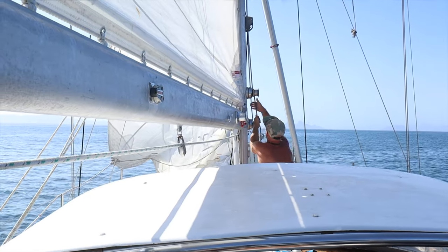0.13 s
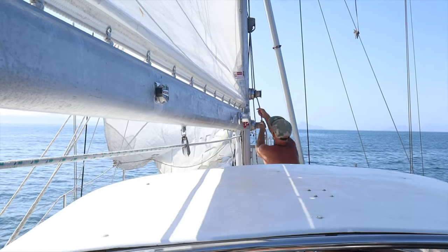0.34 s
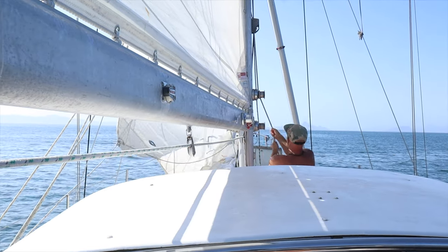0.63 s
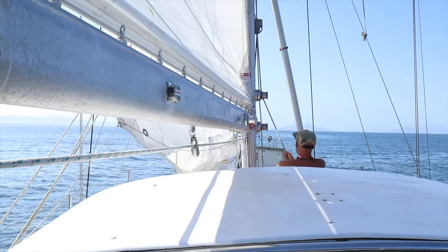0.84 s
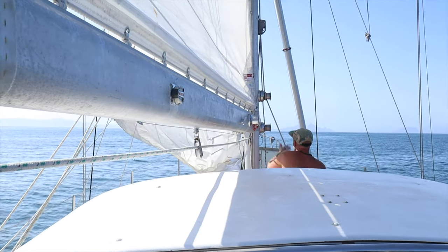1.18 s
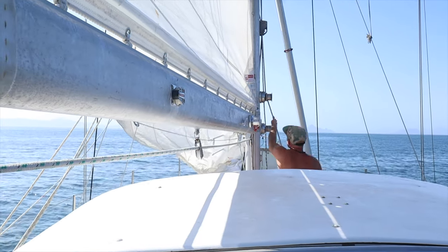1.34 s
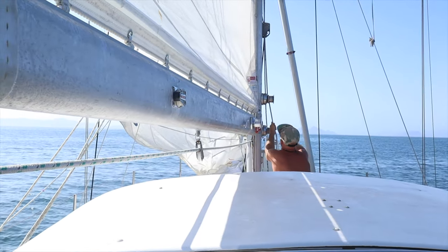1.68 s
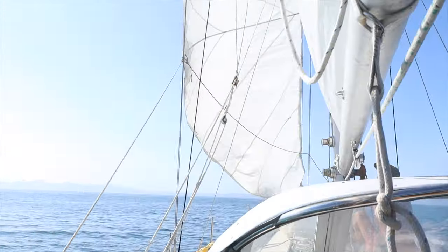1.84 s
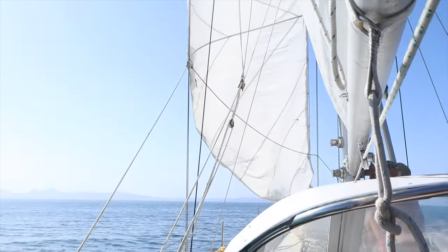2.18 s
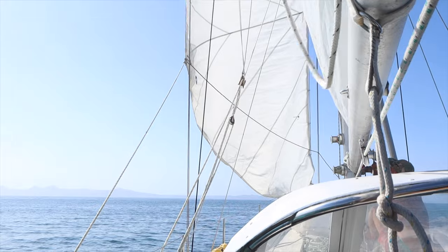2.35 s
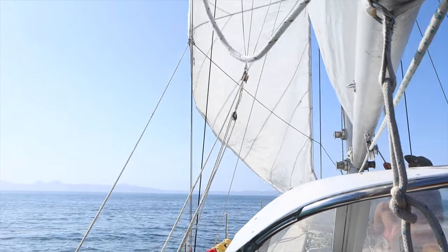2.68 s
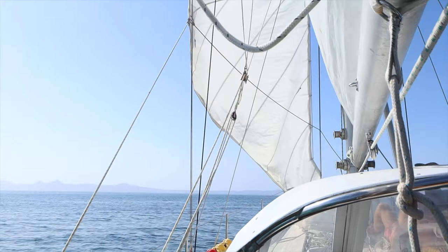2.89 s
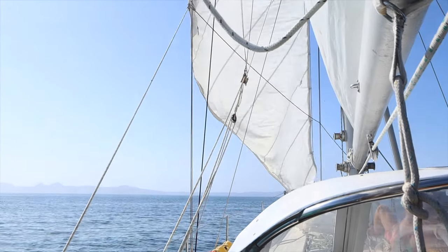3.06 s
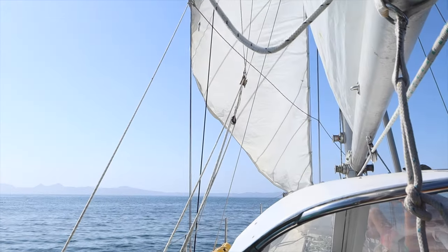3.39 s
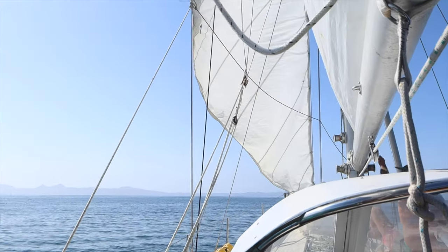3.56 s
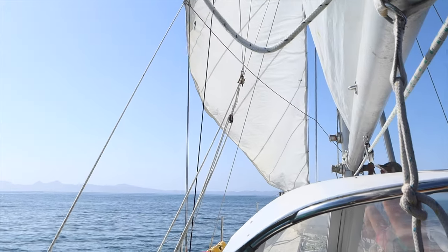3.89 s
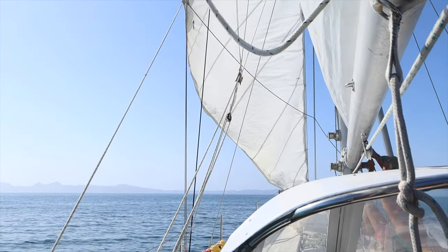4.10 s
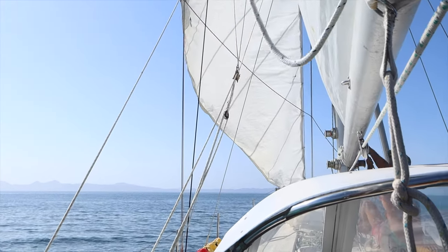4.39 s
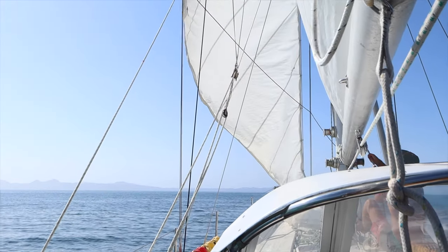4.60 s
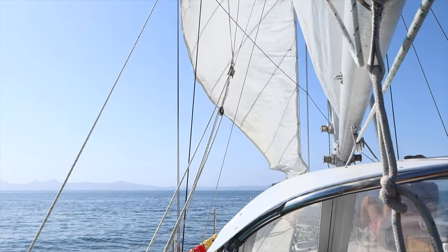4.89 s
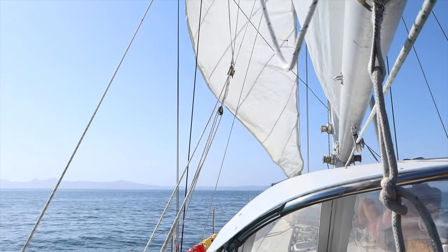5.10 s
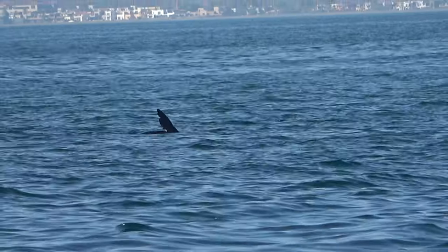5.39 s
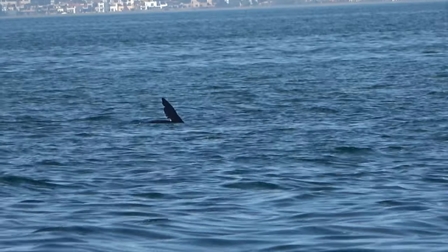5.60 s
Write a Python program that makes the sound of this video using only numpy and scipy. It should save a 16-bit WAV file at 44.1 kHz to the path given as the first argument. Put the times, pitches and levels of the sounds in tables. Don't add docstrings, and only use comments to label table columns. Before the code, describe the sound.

Three quick hauls of rope spin a clicking, ringing winch with short pulley squeals, amid low wind buffeting and a final wash of water.

```python
import sys
import numpy as np
from scipy import signal
from scipy.fft import rfft, irfft, next_fast_len
from scipy.io import wavfile
from scipy.ndimage import uniform_filter1d

SR = 44100
rng = np.random.default_rng(int(sys.argv[2]) if len(sys.argv) > 2 else 0)


def volts(x):
    e = np.asarray(x, float) / 20
    return 10 ** e


def materialize(psi):
    bounded = np.clip(np.atleast_2d(psi).T, -1, 1)
    quanta = np.round(bounded * 32767).astype(np.int16)
    wavfile.write(sys.argv[1], SR, quanta)


N = 253134
TIME = np.arange(N) / SR
HAUL = np.digitize(TIME, [1.85, 3.8])

# (time [s], roar of the rope [dB], jolting of the drum [dB])
HAULS = [
    [(.24, -52, -82), (.278, -42.5, -52), (.318, -30.5, -43), (.57, -21, -19), (1.006, -18, -22),
     (1.038, -22, -21), (1.194, -38, -35.5), (1.23, -54, -58)],
    [(2.32, -58, -81), (2.352, -40, -51), (2.552, -26, -34.5), (2.698, -21, -25.5), (3.002, -16.5, -25),
     (3.144, -26.5, -27), (3.23, -44, -40), (3.3, -56.5, -66)],
    [(4.27, -74.5, -67), (4.296, -33.5, -57), (4.358, -45, -48.5), (4.416, -35, -44.5), (4.618, -24, -27.5),
     (4.978, -21, -26.5), (5.124, -28, -30.5), (5.23, -35.5, -44), (5.34, -88, -78)],
]
# (time [s], speed [teeth per s])
SPEED = [
    [(0.2828, 31.3), (0.39, 71.6), (0.5, 94.4), (0.68, 138.7), (0.9, 143.9), (1.06, 114.5)],
    [(2.356, 28.8), (2.47, 45.8), (2.6, 83.6), (2.83, 153.2), (2.95, 148.2), (3.09, 124.1)],
    [(4.3899, 28.8), (4.47, 62.7), (4.56, 76.3), (4.8, 143.5), (5.0, 123.0), (5.1, 112.6)],
]
# (time [s], click level [dB], pawl ring level [dB])
FIRST_TEETH = [(0.2813, -23.5, -30), (0.3113, -24, -23), (0.3315, -25, -30), (0.3508, -19, -17),
               (0.3674, -21, -23), (0.382, -20, -33), (0.397, -16.5, -28), (0.41, -25, -23),
               (0.4234, -19, -29), (0.4358, -20, -13), (0.4474, -20, -32), (0.46, -25, -18),
               (0.4713, -21, -29), (0.4827, -21, -27), (2.356, -30.5, -39), (2.39, -32, -42),
               (2.4162, -27, -39), (2.44, -29, -40), (2.4647, -27, -37), (2.486, -34, -48),
               (2.5042, -30, -38), (2.522, -32, -40), (2.537, -24, -41), (2.549, -32, -42),
               (2.5645, -27, -37), (2.579, -28, -29), (2.591, -30, -36), (2.6024, -26, -26),
               (2.6113, -27, -33), (2.6244, -28, -32), (4.3899, -31, -43), (4.4189, -27, -40),
               (4.441, -30, -43), (4.4588, -25, -38), (4.474, -27, -38), (4.491, -30, -33),
               (4.5052, -27, -36), (4.52, -26, -27), (4.5334, -26, -37), (4.546, -33, -35),
               (4.5584, -33, -39), (4.573, -28, -32), (4.5847, -34, -29), (4.593, -28, -22),
               (4.603, -24, -23)]
# (time [s], click level [dB], pawl ring level [dB])
STRAY_TEETH = [(0.253, -35, -48), (1.07, -19, -12), (1.1, -12.5, -22), (1.1264, -15, -34),
               (1.1797, -15, -46), (3.099, -17, -58), (3.135, -13, -20), (3.167, -17, -28),
               (3.1944, -27.5, -40), (4.2941, -28.5, -50), (4.3408, -21.5, -38), (5.109, -15, -37),
               (5.167, -20, -46), (5.2174, -34, -49)]
# (time [s], pawl ring level [dB])
HARD_LANDINGS = [(0.5021, -10.5), (0.531, -16), (0.551, -14), (0.5628, -21), (0.625, -8), (.6675, -16),
                 (0.75, -7), (.762, -8), (0.7713, -3), (0.783, -4), (0.8, -10), (0.8244, -5), (0.838, -15),
                 (0.866, -6), (0.879, -10), (0.91, -3.5), (.963, -10), (1.021, -14), (2.7976, -16),
                 (2.8335, -25), (2.847, -9), (2.9163, -12), (2.942, -15), (3.03, -20), (4.6307, -18),
                 (4.7853, -16), (4.829, -8.5), (4.8904, -14), (4.9635, -13), (5.0503, -24)]
# (frequency [Hz], level [dB per Hz])
CLICK_COLOUR = [(2500, -20.5), (4500, -8), (6000, -2.5), (7500, 1.5), (9300, -4.5), (10500, -12.5),
                (12200, -16.5), (14000, -10.5), (15800, -12)]
CLICK_TOP_DB = [-6.5, -3.7, -4.5]
RATTLE_DB = [-6, -5.5, -5.5]
# (frequency [Hz], level [dB], time to fall 60 dB [s])
PAWL_MODES = [(7040, -4.5, 0.081), (14800, -22.5, 0.018), (8100, -19.5, 0.0197)]
DRUM_HZ = [334, 1060, 1490, 2280, 2716, 4498, 6475, 8585, 8764, 10690, 10940, 13535, 14780]
# (time to fall 60 dB [s], level in haul 1 [dB], haul 2 [dB], haul 3 [dB])
DRUM_MODES = [(0.11, -20, -26, -3), (0.12, -29, -3, 3.5), (0.088, -9, -7.5, 4.5), (0.04, -4, 2, 0),
              (0.16, -6.5, -4.5, -7), (0.17, -6, -7, -5.5), (0.085, 4, -1, 0), (0.15, -5.5, -3, -3),
              (0.15, -19, -4, -5), (0.12, -24, -18, -4), (0.23, -27.5, -11.5, -16.5),
              (0.11, -16, -30.5, -29.5), (.035, -7, -13, -10)]
# (time [s], length [s], start level [dB])
FREE_RINGS = [
    [(5.159, 0.036, -21)],
    [(4.884, 0.049, -18)],
    [(1.027, 0.057, -21.5), (3.063, 0.16, -28)],
    [],
    [(1.01, 0.084, -24.5), (1.092, 0.08, -31.5), (2.931, 0.048, -23), (2.999, 0.03, -20),
     (3.049, 0.048, -18.5), (3.115, 0.14, -25.5), (4.91, 0.043, -23.0), (5.109, 0.12, -25.5)],
    [(0.574, 0.026, -20.5), (0.605, 0.052, -34), (0.74, 0.035, -27), (0.832, 0.042, -23.5),
     (0.883, 0.037, -35), (0.921, 0.051, -26), (0.976, 0.03, -24.4), (1.033, 0.058, -27),
     (1.079, 0.026, -24.5), (1.103, 0.092, -27.5), (3.003, 0.074, -20), (3.098, 0.045, -26.5),
     (3.167, 0.12, -44), (4.632, 0.049, -23.5), (4.862, 0.071, -24.5), (4.904, 0.076, -29),
     (4.978, 0.027, -31.8), (5.091, 0.11, -28.5)],
    [(0.388, 0.07, -26.5), (0.458, 0.043, -26.5), (0.585, 0.055, -18), (0.907, 0.032, -18),
     (0.933, 0.035, -16.5), (0.967, 0.036, -16.5), (1.022, 0.051, -18.5), (1.096, 0.078, -28),
     (1.175, 0.023, -23.5), (3.128, 0.044, -31), (3.171, 0.063, -38), (4.292, 0.038, -45),
     (5.031, 0.054, -28), (5.104, 0.021, -26), (5.132, 0.057, -41)],
    [(0.562, 0.04, -26.8), (0.842, 0.029, -24.0), (1.004, 0.038, -24.2), (1.04, 0.072, -26.5),
     (2.951, 0.04, -28.1), (3.109, 0.066, -31), (3.169, 0.075, -45), (4.297, 0.048, -53),
     (4.632, 0.046, -28), (5.054, 0.062, -33), (5.113, 0.029, -30), (5.144, 0.084, -43)],
]
# (time [s], length [s], start level [dB])
HIGH_RINGS = [
    [(0.555, 0.052, -27.8), (1.041, 0.088, -32), (2.907, 0.048, -18.5), (3.013, 0.042, -25.5),
     (3.046, 0.07, -30), (3.115, 0.097, -36.9), (4.292, 0.03, -44), (4.629, 0.041, -25),
     (4.897, 0.042, -30), (5.092, 0.099, -31)],
    [(0.529, 0.097, -30), (2.516, 0.039, -45), (2.552, 0.026, -32), (2.598, 0.038, -35),
     (2.704, 0.061, -27), (2.772, 0.04, -27), (2.803, 0.038, -31), (2.835, 0.035, -36), (3.147, 0.055, -42),
     (3.196, 0.042, -49.7), (4.537, 0.035, -28), (4.563, 0.038, -28.5), (4.607, 0.062, -30),
     (4.688, 0.039, -40), (4.741, 0.031, -36.2), (4.773, 0.05, -30), (4.888, 0.032, -31),
     (4.911, 0.043, -36.4), (5.002, 0.056, -38.1), (5.056, 0.052, -32), (5.115, 0.083, -32.5)],
    [(1.095, 0.081, -46), (2.925, 0.063, -36.6), (3.03, 0.051, -42), (3.109, 0.127, -47),
     (4.628, 0.032, -32), (4.65, 0.062, -37)],
    [(0.563, 0.042, -33), (0.599, 0.064, -37), (0.841, 0.038, -30), (1.023, 0.058, -26),
     (1.082, 0.056, -38.8), (1.131, 0.048, -46.1), (2.702, 0.048, -44), (2.748, 0.081, -41.3),
     (2.914, 0.047, -32.0), (3.004, 0.057, -42.5), (3.067, 0.037, -41.0), (3.098, 0.072, -43.1),
     (3.168, 0.039, -51.8), (4.628, 0.069, -41.4)],
    [(0.583, 0.028, -29), (0.619, 0.051, -31), (0.663, 0.041, -28), (0.741, 0.035, -25),
     (0.877, 0.052, -23), (0.939, 0.04, -28), (0.973, 0.033, -32.0), (2.792, 0.033, -34),
     (2.876, 0.027, -35), (3.078, 0.052, -44), (4.747, 0.027, -39.9)],
]
# (start [s], end [s])
DRUM_FREE = [
    (.2, 1.22),
    (2.3, 3.27),
    (4.25, 5.25),
]
# (time [s], length [s], first pitch [Hz], last pitch [Hz], level [dB])
SQUEALS = [(0.317, 0.02, 400, 500, -28), (0.331, 0.033, 614, 642, -24), (0.361, 0.044, 630, 652, -27.5),
           (0.369, 0.052, 736, 784, -30), (0.388, 0.017, 1190, 1170, -23), (.389, 0.016, 990, 1010, -27),
           (0.431, 0.015, 1310, 1330, -22), (0.468, 0.028, 1314, 1325, -27), (0.471, .028, 1520, 1450, -31),
           (2.346, 0.057, 933, 966, -35), (2.383, 0.05, 720, 665, -28.5), (2.418, 0.046, 783, 808, -28),
           (2.422, 0.047, 1135, 1373, -23.5), (2.457, 0.039, 1388, 1257, -22),
           (2.476, 0.045, 1096, 1075, -21), (2.52, 0.012, 1030, 1040, -24), (4.364, 0.072, 1043, 983, -35),
           (4.408, 0.072, 992, 978, -22.5), (4.473, 0.021, 1180, 1190, -18.5),
           (4.491, 0.033, 1150, 1120, -19.5)]
# (frequency [Hz], level [dB per Hz])
ROAR_COLOUR = [(350, -34.5), (600, -4.5), (1690, 0.5), (2040, -4), (2750, -4), (3170, -9.5), (4270, -11.5),
               (4590, -18), (5470, -34), (7000, -12.5), (9100, -65.5), (15400, -120)]
# (frequency [Hz], level [dB per Hz])
LOW_ROAR_COLOUR = [(88, -23), (150, -4.5), (215, -7), (317, 1), (462, -2.5), (502, -4.5), (900, -5.5),
                   (1170, -17.5), (1980, -120)]
LOW_ROAR_DB = [-27.5, -27, -24.5]
# (time [s], level [dB], centre [Hz], width [octaves], length [s])
SLAPS = [(1.01, -23, 2570, 2, 0.067), (1.177, -37.5, 1400, 0.91, 0.017), (1.295, -43, 900, 1.6, 0.018),
         (1.337, -44.5, 1500, 0.5, 0.015), (1.356, -46, 1500, 0.51, 0.017), (1.334, -42, 448, 0.58, 0.034),
         (1.409, -41, 330, 0.53, 0.028), (1.366, -52, 7000, 0.76, 0.014), (1.378, -47.5, 3000, 1.4, 0.015),
         (1.508, -50, 1002, 1.4, 0.013), (1.55, -40, 680, 1.3, 0.042), (1.776, -42.5, 885, 1.2, 0.019),
         (1.612, -56, 2500, 1.1, 0.014), (0.105, -53, 1500, 0.67, 0.011), (.186, -58, 4500, 1.1, .006),
         (2.044, -56, 7000, 0.68, .01), (2.24, -44.5, 1850, 0.73, 0.042), (2.252, -44, 1044, .3, 0.023),
         (2.907, -25, 2980, 2.4, 0.049), (3.551, -57.5, 6150, 1.2, 0.055), (3.59, -57, 6500, 1.6, .01),
         (4.283, -43, 2490, 1.3, 0.016), (4.292, -38.5, 2170, 1.8, 0.019), (4.62, -29, 2940, 1.3, 0.04),
         (5.266, -41.5, 800, 0.85, 0.036), (1.383, -42.5, 494, 0.92, 0.028), (1.451, -56, 600, 0.74, 0.065),
         (5.013, -31, 3000, 1.4, 0.018), (5.053, -28.5, 2880, 1.5, 0.1), (5.196, -48, 2490, 2.2, 0.019),
         (5.533, -51, 4800, 0.29, 0.0065), (0.909, -15, 6550, 0.47, 0.003)]
# (time [s], length [s], pitch [Hz], level [dB])
PINGS = [(4.29, .022, 2210, -30.5), (2.248, 0.022, 1400, -52), (1.26, .025, 9950, -51),
         (1.657, 0.031, 5100, -55), (1.785, .015, 4400, -50), (1.84, 0.024, 3600, -48.5),
         (5.393, 0.024, 1000, -47), (5.612, 0.048, 1040, -44.5), (5.66, 0.015, 580, -33),
         (5.716, .022, 2300, -47)]
# (time [s], thump level [dB])
GUSTS = [
    [(0.0, -38.5), (.24, -41.5), (.312, -34.5), (1.036, -33), (1.422, -41.5), (1.545, -33)],
    [(1.54, -24.5), (1.74, -33), (1.78, -27.5), (2.4, -30.5), (3.01, -26), (3.09, -24), (3.84, -24.5),
     (4.36, -28), (4.42, -25), (5.38, -26.5)],
    [(5.385, -39), (5.74, -37)],
]
# (frequency [Hz], level [dB per Hz])
WIND_COLOUR = [(11, -45.5), (18, -1), (35, -4), (72, -6.5), (196, -20.5), (284, -28.5), (363, -30.5),
               (516, -37.5), (649, -40), (1200, -75.5), (1560, -82), (2640, -120)]
# (time [s], peak level [dB])
THUMPS = [(1.55, -22), (1.77, -17.5), (2.75, -19), (2.83, -12.5), (3.099, -16), (3.441, -17),
          (3.691, -13.5), (3.83, -11.5), (4.13, -12.5), (4.44, -16), (5.261, -18), (5.349, -21)]
# (start [s], end [s], level [dB])
VIEWS = [
    (0, 1.85, -39),
    (1.85, 5.385, -52.5),
]
# (frequency [Hz], level [dB per Hz])
AIR_COLOURS = [
    [(26, -36), (45, 0.5), (92, -11), (166, -3), (314, -2.5), (421, -14.5), (488, -6), (706, -12.5),
     (1100, -18.5), (3320, -30.5), (16000, -39.5)],
    [(410, -15.5), (700, 0.5), (1480, -6.5), (1970, -12.5), (2080, -10.5), (2770, -14), (3410, -15),
     (16000, -24)],
]
# (time [s], water level [dB], spray level against the water [dB])
WASH = [
    (5.385, -38, -34),
    (5.413, -47.5, -17.5),
    (5.74, -41.5, -9.5),
]
# (frequency [Hz], level [dB per Hz])
WASH_COLOUR = [(88, -43.5), (150, -1), (328, -22), (376, -0.5), (555, -10), (675, -11), (979, -6),
               (1260, -13), (1690, -12), (5050, -21.5), (16000, -51.5)]


def teeth():
    times, speeds = [], []
    for s, rate in map(np.transpose, SPEED):
        t = np.arange(s[0], s[-1], .002)
        speed = np.interp(t, s, rate)
        turn = np.r_[0, np.cumsum(speed[1:] + speed[:-1]) * .001]
        times.append(np.interp(np.arange(int(turn[-1]) + 1), turn, t))
        speeds.append(np.interp(times[-1], t, speed))
    times = np.concatenate(times)
    return times + rng.normal(0, .0005, len(times)), np.concatenate(speeds)


def tooth_train(fast):
    spin = np.zeros(N)
    spin[(fast * SR).astype(int)] = volts(rng.normal(0, 1.7, len(fast)))
    spin[[int(s * SR) for s, _ in HARD_LANDINGS]] = volts(-5.5)
    return spin


def tooth_clicks(spin, singles, rattle_db):
    slow = np.zeros(N)
    slow[(singles[:, 0] * SR).astype(int)] = volts(singles[:, 1])
    bright = coloured(rng.standard_normal(N), CLICK_COLOUR)
    top = signal.sosfiltfilt(signal.butter(3, 10500, "high", fs=SR, output="sos"), bright)
    bright = bright + top * (volts(np.array(CLICK_TOP_DB)[HAUL]) - 1)
    merged = rms_one(fading(spin, 0.034) + 0.59 * fading(spin, 0.003)) * volts(-5) + volts(-5)
    touch = np.roll(fading(slow, .03), -350)
    single = fading(slow, .05) + .5 * fading(slow, .006) + .2 * touch
    single = uniform_filter1d(single, size=30, origin=14)
    return bright * (volts(-14.5) * single + volts(rattle_db + 0.5) * merged)


def pawl_rings(fast, singles, rattle_db):
    out = np.zeros(N)
    strength_db = rng.normal(0, 6.98, len(fast))
    rings = [(s, .008, db + 2) for s, _, db in singles]
    rings += [(s, .013, db) for s, db in HARD_LANDINGS]
    rings += [(s, .009, rattle_db[int(s * SR)] + 8 + k) for s, k in zip(fast, strength_db)]
    for hz, mode_db, t60 in PAWL_MODES:
        for (s, length, db), luck in zip(rings, rng.standard_normal((len(rings), 2))):
            pitch = hz * (1 + 0.005 * luck[0])
            spread_db = (hz != PAWL_MODES[0][0]) * 4 * luck[1]
            add_tone(out, s, length, pitch, pitch, db + mode_db + spread_db, 60 * length / t60, .001, .003)
    return out


def drum(jolt_db):
    out, free = np.zeros(N), np.zeros(N)
    for hz, (t60, *level_db), blows in zip(DRUM_HZ, DRUM_MODES, FREE_RINGS + HIGH_RINGS):
        hit = rng.random(N) < 400 / SR
        jolts = hit * volts(2.6 * np.minimum(rng.exponential(1, N), 3)) * rng.choice([-1, 1], N)
        taken = np.zeros(N)
        for s, length, db in blows:
            taken[int(s * SR):int((s + length) * SR)] = 1
            add_tone(free, s, length, hz, hz, db + .4, 75 * length, .004, .014)
        mode_db = jolt_db + np.array(level_db)[HAUL] - 13
        mode_db = mode_db + 0.39 * np.minimum(jolt_db + 36, 0)
        out += ring(jolts * volts(mode_db), hz, t60) * (1 - .8 * uniform_filter1d(taken, size=400))
    out *= sum(np.clip((end - TIME) / .05, 0, 1) * (TIME > start) for start, end in DRUM_FREE)
    ringing = out + free * (1 + .2 * drift(35))
    return np.interp(TIME + 1.6e-5 * drift(30), TIME, ringing)


def sheave():
    out = np.zeros(N)
    for s, length, first_hz, last_hz, db in SQUEALS:
        add_tone(out, s, length, first_hz, last_hz, db + 1.5, 0, .01, .008)
    wavering = np.interp(TIME + .00013 * drift(70), TIME, out)
    return wavering * (1 + .27 * drift(110))


def rope(spin):
    roar_db = in_time(HAULS, 1)
    usual_jerk = uniform_filter1d(1. * (spin > 0), 2000) * 500
    jerk = 1 + .65 * (fading(spin, .03) + .4 * fading(spin, .006) - .4 * usual_jerk)
    low_db = np.array(LOW_ROAR_DB)[HAUL] + 0.67 * (roar_db + 19.5)
    low = volts(low_db) * patchy(LOW_ROAR_COLOUR, 2.54, 20)
    return volts(roar_db - 1.5 + 1.7 * drift(30)) * jerk * patchy(ROAR_COLOUR, 0.43, 16) + low


def rigging():
    out = np.zeros(N)
    for s, db, hz, octaves, length in SLAPS:
        half = 2 ** (octaves / 2)
        band = np.minimum([hz / half, hz * half], [9000, 12000])
        t = np.arange(4096) / SR / length
        band_filter = signal.butter(2, band, "band", fs=SR, output="sos")
        burst = rms_one(signal.sosfilt(band_filter, rng.standard_normal(len(t))))
        out[int(s * SR):][:len(t)] += volts(db + 8.5) * burst * np.minimum(2.84 * t, 1) * np.exp(-2 * t ** 2)
    for s, length, hz, db in PINGS:
        add_tone(out, s, length, hz, hz, db, 6, .004, .006)
    return out


def wind():
    gusts = uniform_filter1d(volts(in_time(GUSTS, 1) - 0.5), size=600)
    out = gusts * patchy(WIND_COLOUR, 1.7, 7.6)
    for s, db in THUMPS:
        add_tone(out, s - .017, .04, 45, 30, db - 2, 0, .015, .02)
    return out


def air_and_sea():
    out = np.zeros(N)
    for (start, end, db), colour in zip(VIEWS, AIR_COLOURS):
        out += volts(db) * (TIME >= start) * (TIME < end) * patchy(colour, 1.1, 8)
    return out * volts(-5 * (TIME < 0.73))


def water():
    noise = patchy(WASH_COLOUR, 2.6, 24)
    top = signal.sosfiltfilt(signal.butter(2, 5000, "high", fs=SR, output="sos"), noise)
    spray = rms_one(top) * volts(in_time([WASH], 2) - 4.5)
    return uniform_filter1d(volts(in_time([WASH], 1)), size=300) * (noise - top + spray)


def rms_one(x):
    return x / np.sqrt(np.mean(x ** 2) + 1e-20)


def in_time(tables, column):
    out = np.full(N, -120.)
    for rows in tables:
        s, value = np.array(rows)[:, 0], np.array(rows)[:, column]
        inside = (TIME >= s[0]) & (TIME <= s[-1])
        out[inside] = np.interp(TIME[inside], s, value)
    return out


def drift(rate):
    knots_per_s = 400
    knots = rng.standard_normal(int(N / SR * knots_per_s) + 2)
    r = np.exp(-2 * np.pi * rate / knots_per_s)
    led_in = np.r_[knots[::-1], knots]
    slow = signal.lfilter([1], [1, -2 * r, r * r], led_in)[len(knots):]
    return np.interp(TIME * knots_per_s, np.arange(len(slow)), rms_one(slow))


def coloured(x, colour):
    size = next_fast_len(N + 4096)
    hz, db = np.transpose(colour)
    low, high = np.log(hz[0]), np.log(hz[-1])
    grid = np.log(np.maximum(np.fft.rfftfreq(4096, 1 / SR), 1))
    shape_db = np.interp(grid, np.log(hz), db)
    shape_db = shape_db - 18 * np.maximum(low - grid, 0) - 18 * np.maximum(grid - high, 0)
    cepstrum = irfft(np.log(volts(shape_db)))
    cepstrum[1:2048] *= 2
    cepstrum[2049:] = 0
    response = irfft(np.exp(rfft(cepstrum)))
    return rms_one(irfft(rfft(x, size) * rfft(response, size), size)[:N])


def patchy(colour, flicker_db, rate):
    base = coloured(rng.standard_normal(N), colour)
    edges = 12 * 2 ** np.arange(0, 11, 1.2)
    size = next_fast_len(N)
    bins, hz = rfft(base, size), np.fft.rfftfreq(size, 1 / SR)
    out = np.zeros(N)
    for low, high in zip(edges, edges[1:]):
        band = irfft(bins * (hz >= low) * (hz < high), size)[:N]
        out += band * volts(flicker_db * drift(rate))
    return rms_one(out)


def ring(hits, hz, t60):
    r, w = volts(-60 / (t60 * SR)), 2 * np.pi * hz / SR
    return signal.lfilter([0, np.sin(w)], [1, -2 * r * np.cos(w), r * r], hits + 1e-18)


def fading(hits, t60):
    return signal.lfilter([1], [1, -volts(-60 / (t60 * SR))], hits)


def add_tone(out, s, length, first_hz, last_hz, db, fall_db, rise, cut):
    t = np.arange(min(int(length * SR), N - int(s * SR))) / SR
    turns = first_hz * t + (last_hz - first_hz) * t ** 2 / (2 * length)
    phase = 2 * np.pi * (turns + rng.random())
    edge = np.clip(t / rise, 0, 1) * np.clip((length - t) / cut, 0, 1)
    out[int(s * SR):][:len(t)] += volts(db - fall_db * t / length) * edge * np.sin(phase)


def scene():
    times, speeds = teeth()
    fast = times[speeds >= 92]
    singles = np.r_[np.array(FIRST_TEETH) + [0, 8.5, 2.5], STRAY_TEETH]
    jolt_db = in_time(HAULS, 2)
    rattle_db = jolt_db + np.array(RATTLE_DB)[HAUL] + 0.48 * np.minimum(jolt_db + 27, 0)
    spin = tooth_train(fast)
    winch = tooth_clicks(spin, singles, rattle_db) + pawl_rings(fast, singles, rattle_db) + drum(jolt_db)
    spin[(singles[:, 0] * SR).astype(int)] = 1.13
    mix = winch + sheave() + rope(spin) + rigging() + wind() + air_and_sea() + water()
    return mix[None]


def band_limit(x):
    return signal.sosfilt(signal.butter(12, 16680, fs=SR, output="sos"), x)


def record(dry):
    hiss = volts(-71) * rng.standard_normal(dry.shape)
    rounded = 1.1 * np.tanh(dry / 1.1)
    top_cut = signal.ellip(12, .5, 55, 15950, fs=SR, output="sos")
    return band_limit(signal.sosfilt(top_cut, rounded + hiss))


dry = scene()
out = record(dry)
materialize(out)
```